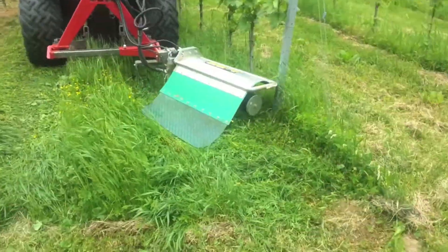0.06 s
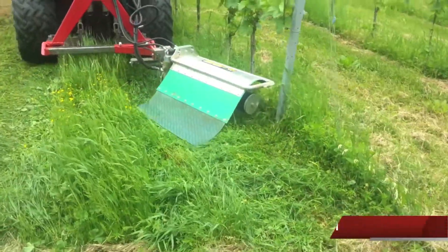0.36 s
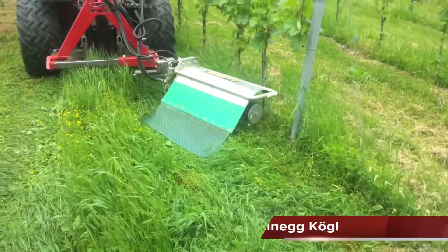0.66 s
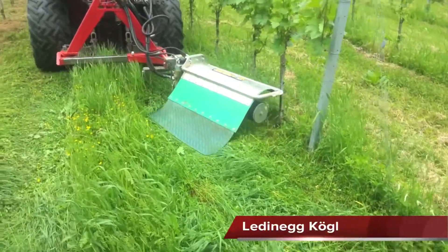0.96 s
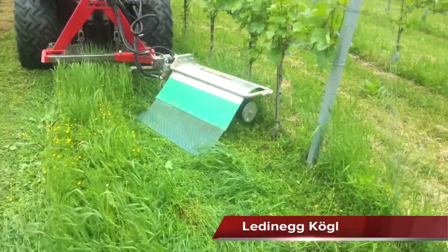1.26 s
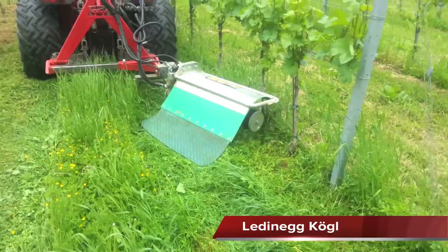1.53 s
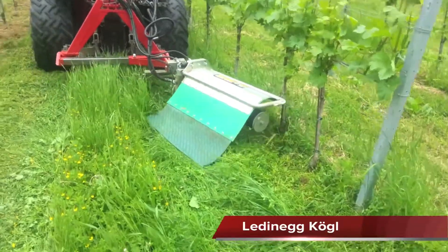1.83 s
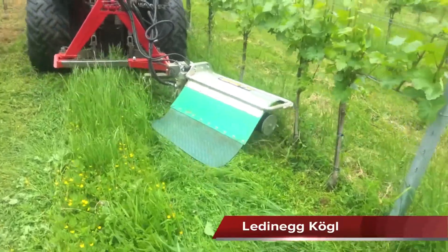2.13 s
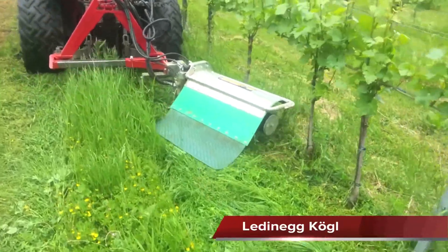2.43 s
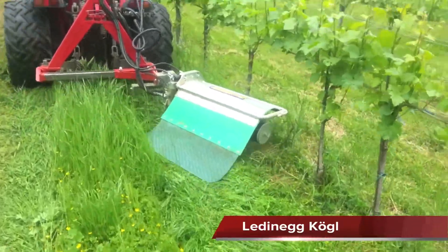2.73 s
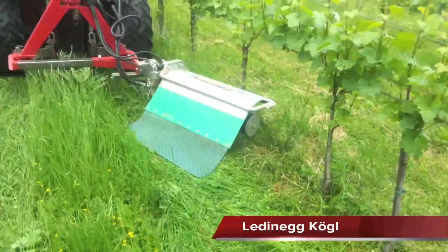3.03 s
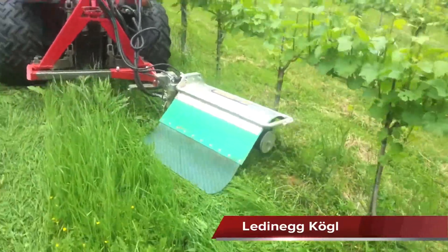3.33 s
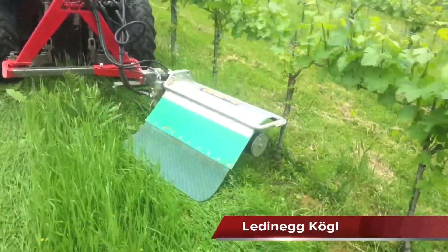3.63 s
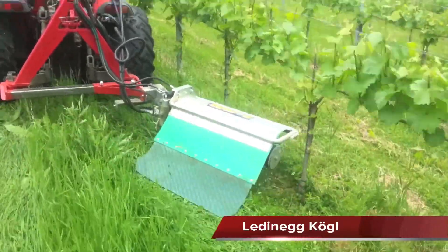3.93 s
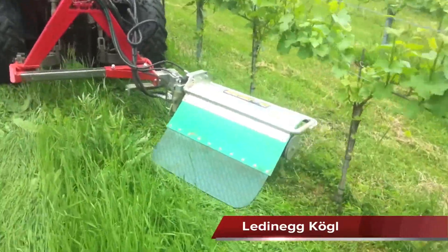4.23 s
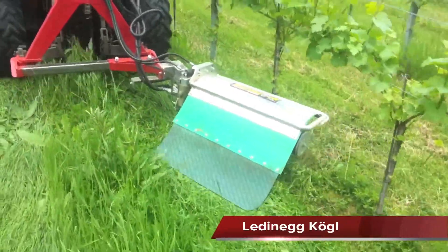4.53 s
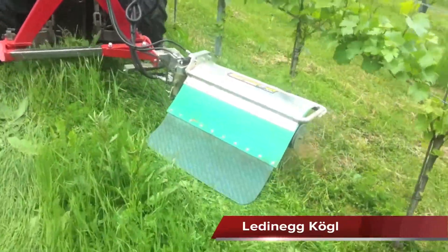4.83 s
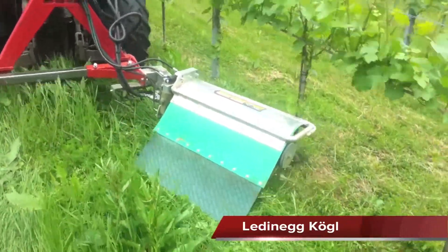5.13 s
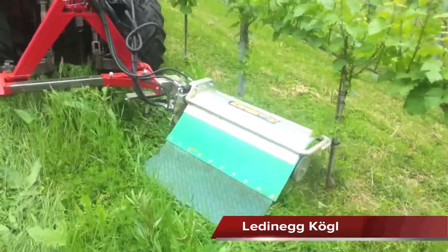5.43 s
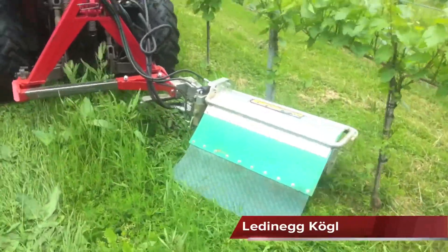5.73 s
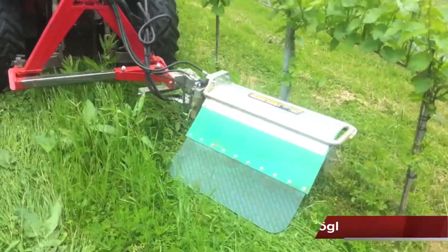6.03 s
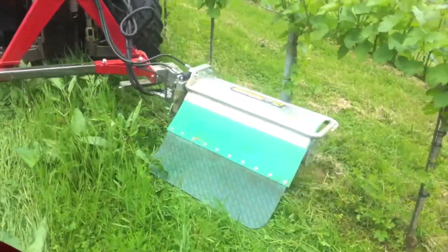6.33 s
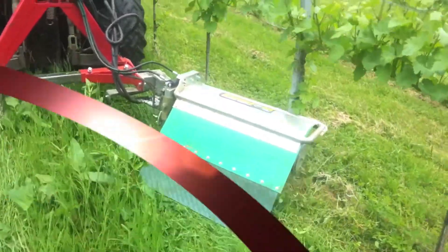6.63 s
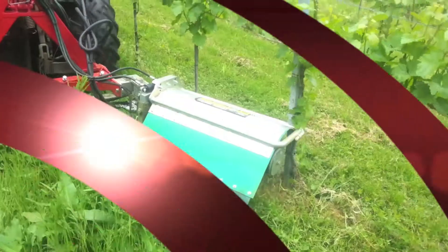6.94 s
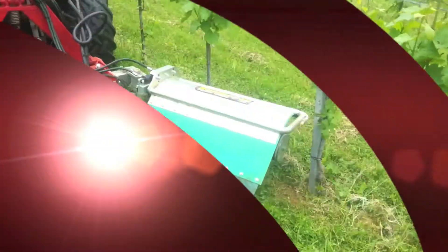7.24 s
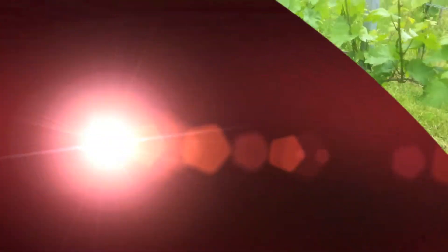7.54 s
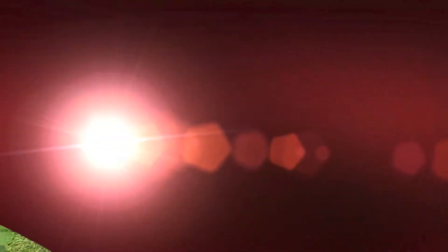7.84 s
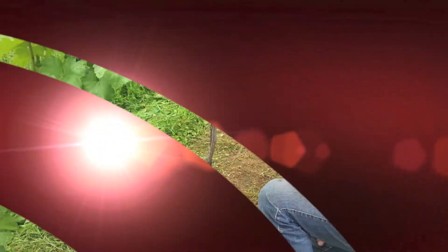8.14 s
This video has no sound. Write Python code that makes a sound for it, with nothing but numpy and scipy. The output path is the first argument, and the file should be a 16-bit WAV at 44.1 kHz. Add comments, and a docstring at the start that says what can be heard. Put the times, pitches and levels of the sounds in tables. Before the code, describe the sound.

Outdoors in a vineyard, a tractor-mounted rotary weeder lashes the grass with spinning cords. Its rapid cracking rattle mixes with a bright hiss of shredded stems and a hollow, tinny ring from the hood, while the diesel engine drones behind it. A few short woody knocks poke through. The microphone moves closer, catching a faint rumble of air, and the sound grows louder before fading out at the end.

```python
"""Rotary weeder in a vine row

A tractor creeps along while two rows of cords on a hooded shaft whip the grass. Each row cracks against
the ground, shreds stems and makes the hood boom; the ground echo colours the cracks. Now and then a cord
knocks on something firm. The diesel drones behind the rattle. The listener closes in; the sound fades."""
import sys
import numpy as np
from scipy import signal
from scipy.io import wavfile
from scipy.ndimage import uniform_filter1d, minimum_filter1d

SR = 44100
rng = np.random.default_rng(int(sys.argv[2]) if len(sys.argv) > 2 else 0)


def master(y):
    """Save y as 16-bit WAV."""
    cut = np.clip(np.atleast_2d(y).T, -1, 1)
    pcm = np.round(cut * 32767)  # scale
    wavfile.write(sys.argv[1], SR, pcm.astype(np.int16))


N = 369558
TIME = np.arange(N) / SR


def gain_of(db):
    """Decibels to gain."""
    return 10 ** (np.asarray(db) / 20)


def unit_rms(x):
    """Scales to rms 1."""
    return x / np.sqrt(np.mean(x ** 2) + 1e-20)


def follow(rows, t=TIME):
    """The columns of a curve table at times t."""
    s, *columns = np.transpose(rows)
    return [np.interp(t, s, column) for column in columns]


def along(pair, t=TIME):
    """Linear from the start value to the end value as the tractor drives on."""
    return pair[0] + (pair[1] - pair[0]) * t / TIME[-1]


def swell(t, centre_s, length_s):
    """A smooth hump of height 1."""
    return np.exp(-(2 * (t - centre_s) / length_s) ** 2)


def drift(per_s):
    """Slow random curve of rms 1."""
    return unit_rms(np.interp(TIME * per_s, np.arange(1000), rng.standard_normal(1000)))


def at_hz(points, hz):
    """Interpolates a table on a log-frequency axis."""
    table_hz, value = np.transpose(points)
    return np.interp(np.log(hz + 1), np.log(table_hz + 1), value)


def colour(x, spectrum, size=4096):
    """Minimum-phase filter, so attacks stay sharp."""
    db = np.maximum(at_hz(spectrum, abs(np.fft.fftfreq(size, 1 / SR))), -80)
    response = np.exp(np.conj(signal.hilbert(np.log(gain_of(db)))))
    taps = np.fft.ifft(response).real
    return signal.oaconvolve(x, taps[None], axes=1)[:, :N]


def resonate(x, hz, width_hz):
    """Resonance of gain 1, steady or moving: shift down to 0 Hz, smooth, shift back."""
    carrier = np.exp(2j * np.pi * np.cumsum(np.full(x.shape[-1], hz)) / SR)
    pole = np.exp(-np.pi * width_hz / SR)
    return 2 * (carrier * signal.lfilter([1 - pole], [1, -pole], x / carrier)).real


def die_away(power, ms):
    """Spreads each impulse of energy into an exponential tail."""
    pole = np.exp(-1000 / (ms * SR))
    return signal.lfilter([1 - pole], [1, -pole], power)


def snaps(power, grain_db):
    """A crowd of tiny snaps of uneven size whose energy follows power."""
    size = gain_of(grain_db * np.repeat(rng.standard_normal(N // 8 + 1), 8)[:N])
    return np.sqrt(np.maximum(power, 0)) * size * rng.standard_normal((2, N))


# Each row: time in seconds, listener's nearness to the hood from 0 to 1.
NEARNESS = [(0, 0.13), (2.7, 0.22), (3.3, 0.39), (4.3, 0.5), (5.2, 0.73), (6.3, 0.87), (7.1, 0.7),
            (7.8, 0.8)]


def by_nearness(far, near, t=TIME):
    """Blends the far and near values as the listener moves."""
    return far + (near - far) * follow(NEARNESS, t)[0]


# Each row: time in seconds, rotor speed in turns per second.
ROTOR_SPEED = [(0.0, 18.19), (1.2, 18.05), (1.75, 18.276), (2.05, 18.019), (2.95, 18.594), (3.95, 18.371),
               (4.35, 19.147), (5.15, 18.84), (6.35, 19.328), (7.2, 18.465), (7.8, 18.826)]


def rotor_turns(start_turn=.17):
    """Shaft angle in turns."""
    return start_turn + np.cumsum(follow(ROTOR_SPEED)[0]) / SR


# Each row: centre in seconds, length in seconds, thickness (+ dense, - sparse), extra boom in dB.
GRASS_PATCHES = [(1.945, .32, 0.81, -0.5), (2.404, .4, -0.6, 2.5), (3.396, .5, 0.76, 0),
                 (3.817, .35, 0.87, -0.5), (4.257, 0.51, -1.2, 3), (5.421, 0.21, 0.29, 5),
                 (6.302, .25, 0.79, -2.5), (7.256, 0.99, 0.54, 3)]


def grass(t=TIME):
    """Thickness and extra boom in dB as patches pass under the rotor."""
    centre_s, length_s, thickness, boom_db = np.transpose(GRASS_PATCHES)
    under_rotor = swell(t[:, None], centre_s, length_s)
    return under_rotor @ thickness, under_rotor @ boom_db


def air_rumble(peak_db=-45.5, peak_s=4.8, rise_db_per_s=1, fall_db_per_s=8, top_hz=130, gust_db=4.5):
    """Faint, lumpy air on the microphone ports builds slowly, then dies down."""
    air = signal.sosfilt(signal.butter(3, top_hz, fs=SR, output="sos"), rng.standard_normal((3, N)))
    gusts = gain_of(gust_db * np.tanh(drift(per_s=22)))
    drop_db = np.maximum(rise_db_per_s * (peak_s - TIME), fall_db_per_s * (TIME - peak_s))
    return gain_of(peak_db - drop_db) * unit_rms(gusts * (air[:2] + air[2]))


# Each row: frequency in Hz, relative clatter level in dB.
CLATTER_SPECTRUM = [(20, -42), (110, -14), (170, -6), (270, -3), (350, -8), (700, -8.5), (1700, 3.5),
                    (2750, -2.5), (4000, -2), (7000, -29.5), (15000, -33.5)]
# Each row: multiple of the rotor speed, relative level in dB.
DRONE_PARTIALS = [(8, -14.5), (9, -3.5), (11, 1.5), (13, -5.5), (16, -11.5), (26, -23.5), (36, -15.5)]


def diesel(firings_per_turn=4, puff_decay=12, hiss=1.8):
    """A noise puff at each firing and a wavering drone of engine and drive line, geared to the rotor."""
    turns = rotor_turns()
    puffs = np.exp(-puff_decay * (firings_per_turn * turns % 1))
    clatter = unit_rms(colour((hiss + puffs) * rng.standard_normal((2, N)), CLATTER_SPECTRUM))
    drone = unit_rms(sum(gain_of(db) * np.cos(2 * np.pi * multiple * turns + drift(per_s=9))
                         for multiple, db in DRONE_PARTIALS))
    return gain_of(by_nearness(-26, -20.5)) * clatter, gain_of(by_nearness(-45, -34.5)) * drone


# Each row: frequency in Hz, width in Hz, relative level in dB.
HOOD_MODES = [(176, 110, -5.5), (206, 43, 2), (244, 68, -2.5), (281.7, 35, -17.5)]


def hood_boom(hits, push_ms=2.1, ahead_ms=2.4, band_hz=(148, 320)):
    """Air pushed ahead of each stroke drums on the hood."""
    power = np.interp(TIME + ahead_ms / 1000, TIME, die_away(hits, push_ms))
    t = TIME[:SR // 4]
    ring = sum(gain_of(db) * width * np.exp(-np.pi * width * t) * np.cos(2 * np.pi * hz * t)
               for hz, width, db in HOOD_MODES)
    boom = signal.oaconvolve(snaps(power, grain_db=-2), ring[None], axes=1)[:, :N]
    boom = signal.sosfilt(signal.butter(3, band_hz, "bandpass", fs=SR, output="sos"), boom)
    _, boom_db = grass()
    return gain_of(by_nearness(-38, -33) + boom_db) * unit_rms(boom)


# Each row: frequency in Hz, relative level in dB.
SHRED_SPECTRUM = [(2650, -25), (4500, -3), (6470, -6), (9530, -4.5), (11300, -7), (13800, -1.5),
                  (14600, -9.5), (15000, -21.5)]
# More or fewer stems torn. Each row: centre in seconds, length in seconds, gain in dB.
STEM_STRETCHES = [(3.8, 0.4, 1.0), (4.95, .8, 1.3), (7.5, 1.6, -2.3)]


def shredding(hits, tear_ms=1.3, spray_ms=3.2, spray_db=9, rustle_db=(-3.5, 8.5), uneven_db=.8):
    """Stems tear at each hit; clippings spray after it and rustle more and more along the row."""
    spray = gain_of(spray_db) ** 2 * die_away(hits, spray_ms)
    power = die_away(hits, tear_ms) + spray + gain_of(along(rustle_db)) ** 2
    stems_db = sum(db * swell(TIME, centre_s, length_s) for centre_s, length_s, db in STEM_STRETCHES)
    stems_db += uneven_db * drift(per_s=22)
    shreds = unit_rms(colour(snaps(power, grain_db=3), SHRED_SPECTRUM))
    return gain_of(by_nearness(-19.5, -16.5) + stems_db) * shreds


# Each row: start in seconds, relative peak in dB, pitch in Hz.
KNOCKS = [(0.129, -11, 1890), (0.323, -6.5, 1800), (0.376, -5.5, 1850), (0.433, -7.5, 596),
          (0.57, -8.5, 730), (1.289, -2.5, 1240), (1.591, -2.5, 1230), (2.032, -7, 1280),
          (2.064, -1.5, 1790), (2.227, -6.5, 1050), (2.255, -5.5, 1140), (3.338, -7, 1050),
          (4.154, -2, 1660), (4.725, -8.5, 1480), (6.305, -5, 560), (7.094, -7, 581)]


def knocks(level_db=-2.5, width_hz=450, decay_ms=3.5, size=1400):
    """A cord meets something firm: a short, woody burst around one pitch."""
    out = np.zeros(N)
    envelope = np.exp(-TIME[:size] * 1000 / decay_ms)
    for start_s, db, hz in KNOCKS:
        tone = resonate(rng.standard_normal(size), hz, width_hz)
        knock = resonate(tone, hz, 2 * width_hz) * envelope
        out[round(start_s * SR):][:size] += gain_of(db + level_db) * knock / abs(knock).max()
    return out


# Each row: frequency in Hz, width in Hz, peak gain in dB, centre in seconds, length in seconds.
SHEET_RINGS = [(295, 45, 7.5, 1.4, 1.6), (405, 59, -4, 6.9, 1.4), (550, 85, -10, 1.2, 1.2),
               (700, 97, -5.5, 5.5, 1.1), (705, 150, -6, 3.9, 1.6), (776, 74, -4.5, .2, 1),
               (1020, 91, -5.5, 3.0, 1.4), (1060, 91, -12, 8.7, 1.2), (1270, 110, -4.5, 2, 1.6),
               (1380, 120, -6, .4, 1.4), (1370, 190, -1.5, 5.3, 0.96), (1660, 80, -3, 4.2, 1.4),
               (1520, 110, -14, 14, 1.1), (1880, 270, 1, 5.4, 1.8), (1937, 110, 2, 0.8, 3.7),
               (1880, 130, -5, 7.2, 1.7), (2470, 83, -2.5, 2, 1.4), (2300, 340, 1, 3.9, 2.6),
               (2895, 110, 3.5, 0.58, 3.5), (3120, 140, -4, 1.6, 1.6), (3500, 130, 1, 0.8, 4.6),
               (3700, 310, -8.5, 5.4, 2.6), (4020, 430, -3.5, 5.1, 1.3), (4140, 250, 1, 0.64, 3.4),
               (4300, 160, -4, 6.2, 1.2), (4600, 140, 3, 1, 2.8)]


def sheet_metal(crack):
    """Tinny rings of the hood, each standing out for a while as the listener's angle changes."""
    return sum(gain_of(db) * swell(TIME, centre_s, length_s) * resonate(crack, hz, width_hz)
               for hz, width_hz, db, centre_s, length_s in SHEET_RINGS)


# Each row: time in seconds, delay in ms, gain relative to the direct crack.
GROUND_ECHO = [(0, 1.66, .5), (1.5, 1.7, .42), (2.3, 1.78, .28), (3.2, 1.92, .3), (4.4, 1.93, .28),
               (5.2, 1.8, .12), (7.8, 1.8, .12)]


def with_ground_echo(direct, top_hz=7000):
    """Adds the ground's reflection, dulled by grass and weaker as the listener moves in."""
    delay_ms, strength = follow(GROUND_ECHO)
    dulled = signal.filtfilt(*signal.butter(1, top_hz, fs=SR), direct)
    echo = np.array([np.interp(TIME - delay_ms / 1000, TIME, side) for side in dulled])
    return (direct + strength * echo) / np.sqrt(1 + strength ** 2)


# Cord groups. Each row: delay in ms, spread in ms, relative level in dB, share of first-cord lateness.
SLAPPING_GROUPS = [(0, .25, .5, 1), (2.9, .8, 2.2, .6), (6.9, 1.3, -3, .3), (11.6, 1.1, -5, .2)]
BRUSHING_GROUPS = [(0, .2, -3, 1), (2.7, .8, 0, .2), (4.9, 1.0, 1.8, 0), (8.7, 1.2, -2.6, 0)]
# The cords bend. Each row: time in seconds, slapping lateness in ms, brushing lateness in ms.
FIRST_CORD_LATENESS = [(0, .6, -.5), (.48, -.5, -1.7), (.9, 1.7, .8), (1.27, .3, -3), (1.52, 1.6, -.7),
                       (1.76, -1.4, -1.3), (2.1, 1.6, -5), (2.42, 1.3, -2), (2.6, -.6, -2.2),
                       (2.95, .2, -.3), (3.4, -.8, -3.8), (3.98, .6, -4), (4.2, 1.1, .2), (4.75, .7, .5),
                       (5.05, -.6, -.6), (5.6, -.3, -3.5), (5.9, -.7, .2), (6.3, -.6, -4), (6.62, 1, -.5),
                       (7.1, -1, -1.5)]


def cord_hits(per_group=3, cord_db=2.5, group_db=2, stroke_db=.6, scatter_ms=.35,
              row_db=(.45, .15), end_shift_ms=(-.3, -3.5)):
    """Energy of each cord landing: the slapping and brushing rows alternate, group after group."""
    strokes_s = TIME[1:][np.diff(np.floor(2 * rotor_turns())) > 0]
    rows = (strokes_s[1::2], SLAPPING_GROUPS), (strokes_s[::2], BRUSHING_GROUPS)
    energy = np.zeros(N)
    for row, (starts_s, groups) in enumerate(rows):
        delay_ms, spread_ms, db, bend = np.repeat(groups, per_group, axis=0).T
        t, thickness = starts_s[:, None], grass(starts_s)[0][:, None]
        timing, force = rng.standard_normal((2, len(t), 1))
        place, size = rng.standard_normal((2, len(t), len(db)))
        group_size = np.repeat(rng.standard_normal((len(t), len(groups))), per_group, axis=1)
        late_ms = bend * follow(FIRST_CORD_LATENESS, t)[row]
        late_ms += (1 - bend) * along((0, end_shift_ms[row]), t)
        landing_ms = late_ms + scatter_ms * timing + delay_ms + spread_ms * place
        drag_db_per_ms = along((.06, .16), t) + .35 * thickness  # dense grass favours late cords
        share = gain_of(db + drag_db_per_ms * delay_ms + cord_db * size + group_db * group_size) ** 2
        stroke_energy = gain_of(row_db[row] + stroke_db * force) ** 2
        share *= stroke_energy / share.sum(1, keepdims=True)
        sample = np.round((t + landing_ms / 1000) * SR).astype(int)
        energy += np.bincount(np.maximum(sample, 0).ravel(), share.ravel(), N)[:N]
    return energy / energy.mean()


# Each row: frequency in Hz, relative level in dB.
CRACK_SPECTRUM = [(100, -50.5), (250, -23.5), (345, -9.5), (470, -4), (680, -4), (850, -4), (1050, -1.5),
                  (1880, -2.5), (2380, -4), (2720, -11), (3100, -4), (4050, -3), (5000, -19), (7000, -31.5)]


def cracks(hits, snap_ms=.4, body_ms=2.1, tail_ms=4.9, treble_hz=2700, dense_db=1, hollow_hz=(750, 510)):
    """Each cord cracks and rattles briefly under the hood, louder and duller in dense grass."""
    thickness, boom_db = grass()
    snap_and_tail = gain_of(-6) ** 2 * (die_away(hits, snap_ms) + die_away(hits, tail_ms))
    crack = colour(snaps(die_away(hits, body_ms) + snap_and_tail, grain_db=1), CRACK_SPECTRUM)
    treble = signal.filtfilt(*signal.butter(3, treble_hz, "highpass", fs=SR), crack)
    crack += (gain_of(by_nearness(-1.45, -.5) - dense_db * thickness) - 1) * treble
    hollow_db = along((-3, 1.5)) + .46 * boom_db  # resonance between hood and ground
    crack += gain_of(hollow_db) * resonate(crack, along(hollow_hz), width_hz=173)
    crack += sheet_metal(crack)
    return gain_of(by_nearness(-18.5, -14.5) + dense_db * thickness) * unit_rms(with_ground_echo(crack))


# Each row: frequency in Hz, left-right likeness from 0 to 1.
PORT_LIKENESS = [(150, .95), (300, .9), (600, .94), (1300, .8), (2200, .64), (2800, .42), (4000, .48),
                 (5600, .4), (8000, .24), (14000, .1)]
# Each row: frequency in Hz, right phase lead in radians.
PORT_LEAD = [(100, -0.31), (1000, -0.11), (1600, -0.65), (2450, -0.7), (3100, 0.89), (4400, 1), (5600, 1.5),
             (7200, 1.58), (14000, 1.1)]
# Each row: frequency in Hz, left over right in dB.
PORT_BALANCE = [(100, -1), (700, 0), (1600, -3), (2400, -1.5), (3100, 5), (4100, 1.1), (5400, 5),
                (6700, 0.5), (9500, 2.5), (12000, 5), (13500, 0.5)]


def stereo_ports(pair):
    """Two unrelated signals become two microphone ports: alike in the bass, apart in treble and up close."""
    frames = dict(fs=SR, nperseg=512, noverlap=384)
    hz, t, (left, unrelated) = signal.stft(pair, **frames)
    hz = hz[:, None]
    likeness = at_hz(PORT_LIKENESS, hz) ** by_nearness(.15, 1.74, t)
    tilt = gain_of(at_hz(PORT_BALANCE, hz) / 2)
    lead_ms = by_nearness(.0037, -.016, t)
    lead_rad = at_hz(PORT_LEAD, hz) + 2 * np.pi * hz * lead_ms / 1000
    right = (likeness * left + np.sqrt(1 - likeness ** 2) * unrelated) * np.exp(1j * lead_rad)
    return signal.istft(np.array([left * tilt, right / tilt]), **frames)[1][:, :N]


def scene():
    """Cord hits drive cracks, shredding and boom over the diesel; knocks and air join them."""
    hits = cord_hits()
    clatter, drone = diesel()
    weeder = cracks(hits) + shredding(hits) + hood_boom(hits)
    return stereo_ports(weeder + clatter) + knocks() + drone + air_rumble()


def record(dry, drive_db=1.5, fade_end_s=7.836, fade_s=1.44, threshold=.92, top_hz=14850):
    """Linear fade-out, quick limiter, soft overload of the tips, low-pass."""
    faded = gain_of(drive_db) * dry * np.clip((fade_end_s - TIME) / fade_s, 0, 1)
    limiter_gain = np.minimum(threshold / (abs(faded).max(0) + 1e-9), 1) ** .3
    limited = faded * uniform_filter1d(minimum_filter1d(limiter_gain, size=60), size=60)
    rounded = limited / (1 + limited ** 8) ** (1 / 8)
    lowpass = signal.firwin(401, top_hz, window=("kaiser", 8), fs=SR)
    return signal.oaconvolve(rounded, lowpass[None], "same")


dry = scene()
out = record(dry)
master(out)
```